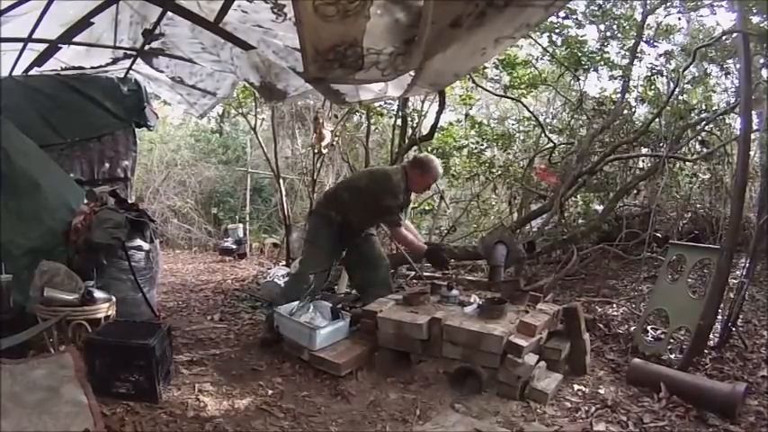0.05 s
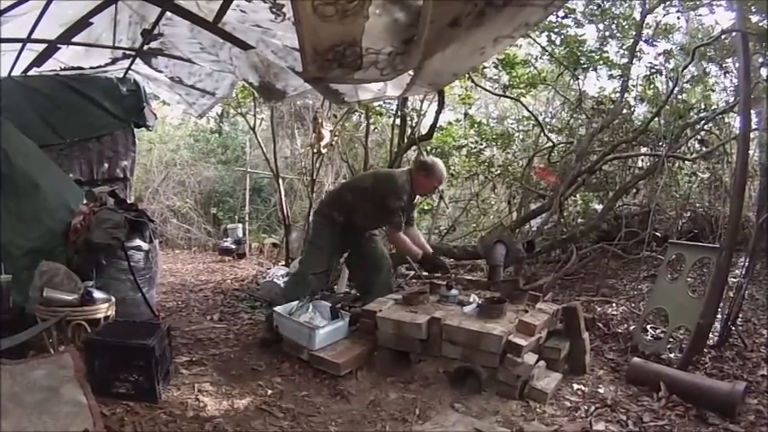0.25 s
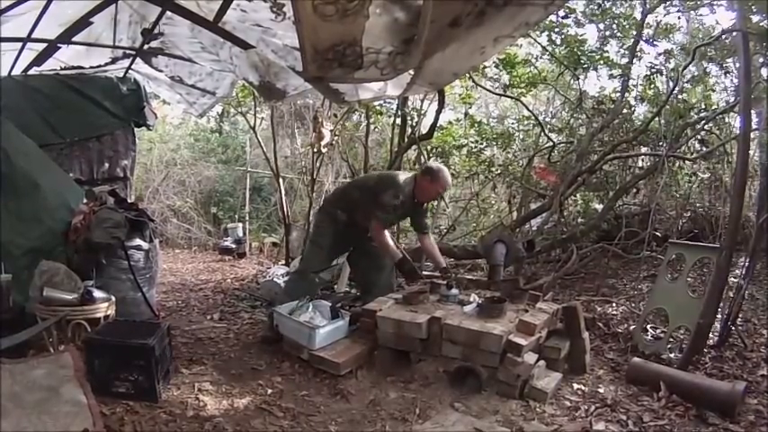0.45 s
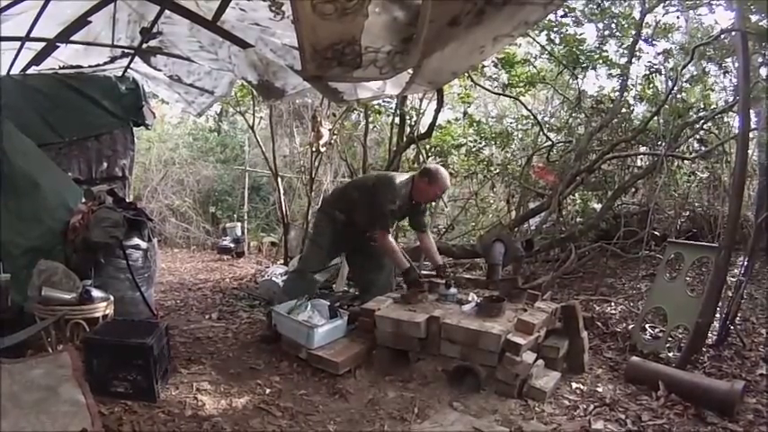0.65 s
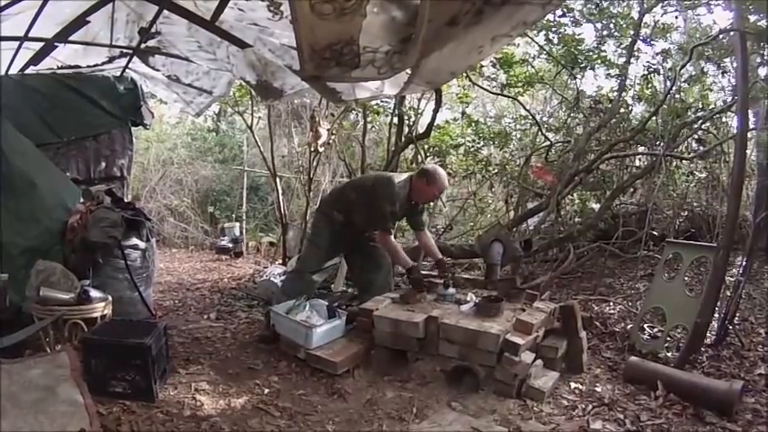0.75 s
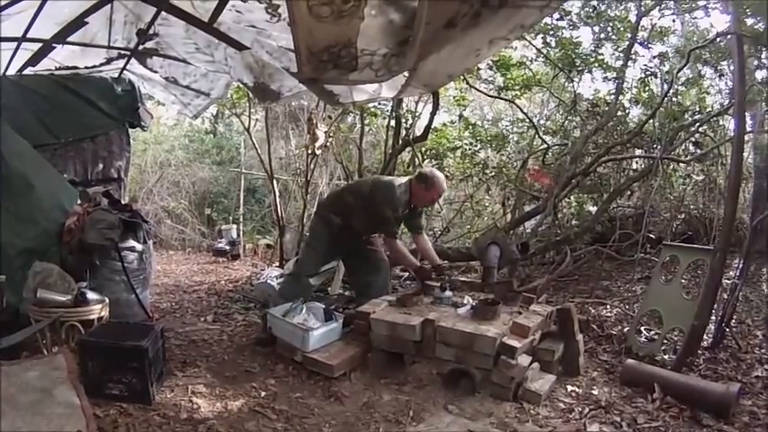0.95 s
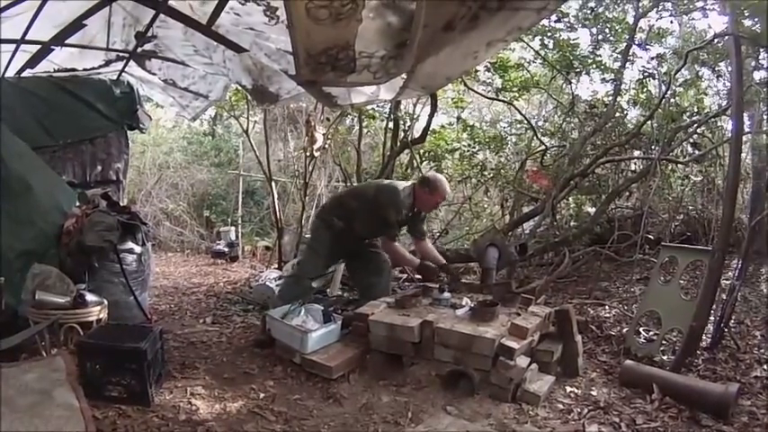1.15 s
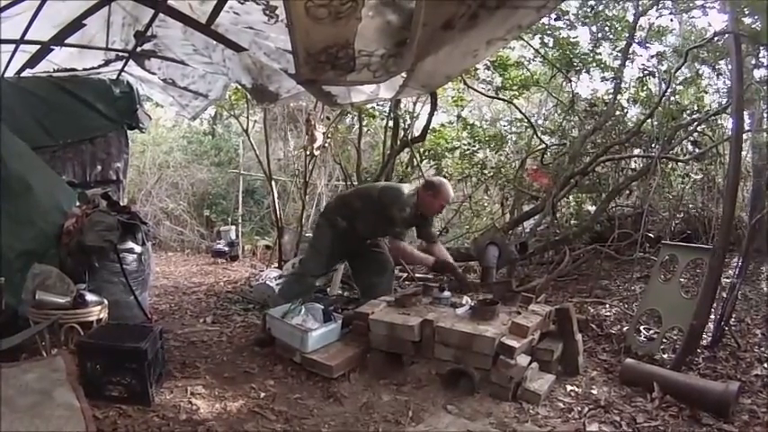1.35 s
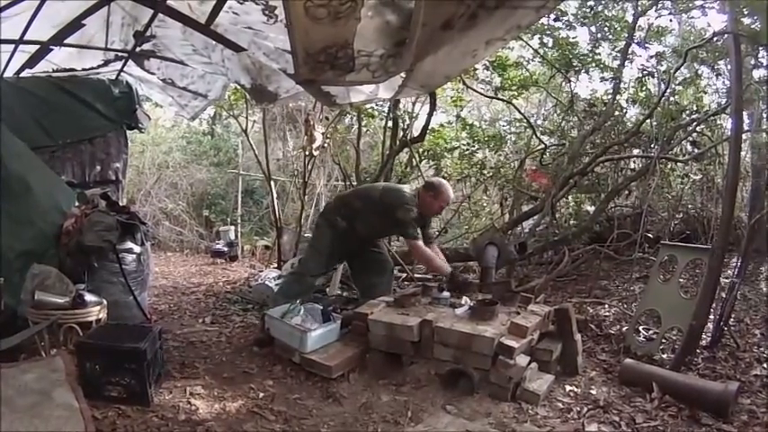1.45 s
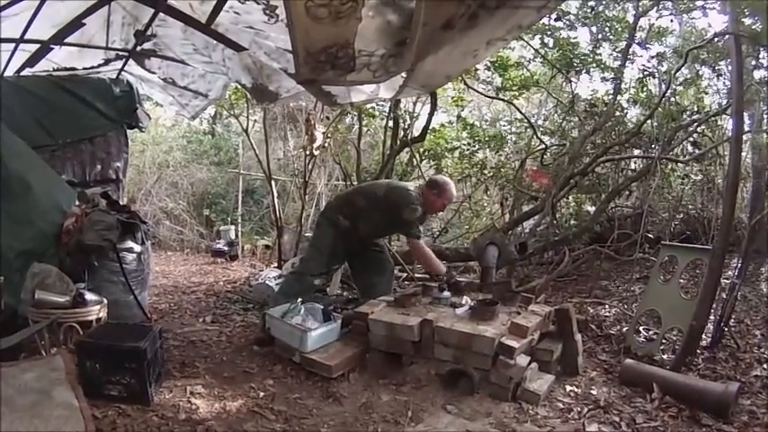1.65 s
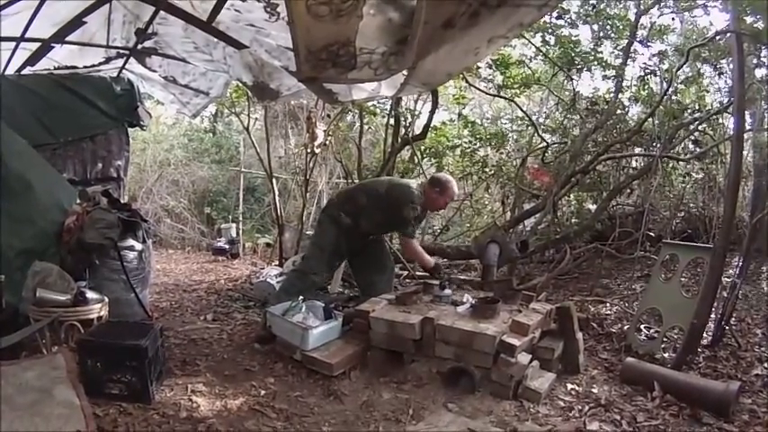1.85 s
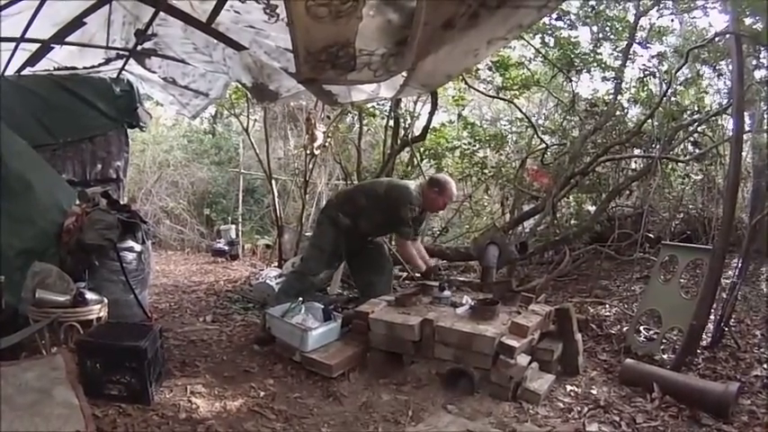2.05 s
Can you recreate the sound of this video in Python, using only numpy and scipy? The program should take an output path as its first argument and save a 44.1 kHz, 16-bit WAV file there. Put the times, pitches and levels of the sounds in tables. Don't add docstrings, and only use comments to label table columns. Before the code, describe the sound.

One sharp, hollow knock of a tool on dry clay and brick comes almost at once, a few metres from the microphone under a tarp, then faint rustling over quiet distant traffic and leaf hiss.

```python
import sys
import numpy as np
from scipy import signal
from scipy.fft import dct
from scipy.io import wavfile
from scipy.ndimage import uniform_filter1d

SR = 44100
rng = np.random.default_rng(int(sys.argv[2]) if len(sys.argv) > 2 else 0)


def convert_level_to_amplitude(level_db):
    exponent = np.asarray(level_db, float) / 20
    return 10 ** exponent


def dump_mix(stems):
    frames = np.atleast_2d(stems).T
    limited = np.clip(frames, -1, 1)
    pcm = np.round(limited * 32767).astype(np.int16)
    wavfile.write(sys.argv[1], SR, pcm)


N = 92610

# frequency in Hz, level in dB per Hz.
TRAFFIC = [(80, -4), (135, -7), (200, -9), (400, -11), (600, -13), (850, -8.5), (1000, -20), (1200, -46)]
# frequency in Hz, level in dB per Hz.
HISS = [(650, -32), (1100, -4.5), (1480, -4), (2010, -3), (3070, -7), (5550, -10.5), (15000, -24.5)]
# time in seconds, level in dB.
WIND = [
    (0.0, -61),
    (1.48, -58),
    (1.51, -75),
    (1.55, -58),
    (1.67, -62.5),
    (1.71, -81),
    (1.82, -56),
    (2.03, -62),
    (2.05, -43.5),
    (2.1, -61),
]
# frequency in Hz, level in dB,
# t60 in seconds, sign.
KNOCK_MODES = [(133, -27.9, 0.0332, -1), (229, -35.2, 0.0833, -1), (275, -48.4, 0.1025, -1),
               (461, -30.3, 0.0404, 1), (503, -16.5, 0.0136, -1), (692, -9.1, 0.008, 1),
               (707, -26.6, 0.0804, 1), (772, -22.3, 0.0872, 1), (812, -14.0, 0.0236, 1),
               (853, -8.7, 0.0178, -1), (984, -19.8, 0.0298, -1), (1148, -28.8, 0.0427, -1),
               (1219, -20.8, 0.008, 1),
               (1581, -23.7, 0.0346, -1), (1681, -30.8, 0.0423, 1), (1757, -28.9, 0.039, -1),
                (1867, -39.3, 0.1057, -1), (1987, -24.4, 0.0894, 1), (2116, -27.9, 0.075, 1),
                (2304, -25.8, 0.14, -1), (2385, -38.3, 0.0639, -1), (2884, -35.3, 0.087, 1),
                (3060, -34.4, 0.1, 1), (3172, -24.5, 0.0278, 1), (3441, -29.8, 0.042, -1),
               (4450, -25, .04, 1), (5460, -21.5, .035, -1)]
# delay in seconds, level in dB, sign.
REFLECTIONS = [(-0.00117, -23.0, 1), (0.0018, -7.0, -1), (0.0038, -18.0, 1), (0.00558, -5.8, -1),
               (0.00628, -10.4, 1), (0.009, -49.8, -1), (0.01061, -9.8, 1), (0.01225, -17.7, 1),
               (0.01308, -28.0, -1), (0.01666, -20.1, -1), (0.02105, -19.6, 1), (0.02643, -24.0, 1),
               (0.04767, -37.8, 1)]
# frequency in Hz, level in dB per Hz.
SCATTER = [(150, -36), (350, -27), (700, -12), (1250, -15.5), (2200, -13.5), (2800, -18), (4500, -23),
           (14000, -47.5)]
# frequency in Hz, t60 in seconds.
SCATTER_T60 = [(200, 0.12), (800, 0.17), (2200, 0.12), (4000, 0.11), (7000, 0.13), (12000, 0.087)]
# time in seconds, peak in dB, frequency in Hz, overtones in dB.
TICKS = [
    (.4358, -50, 3000, -2),
    (1.7468, -53, 4900, -14),
    (1.7483, -55, 4600, -14),
    (1.7496, -54, 4800, -14),
]
# start in seconds, length in seconds, level in dB.
STROKES = [
    (0.488, .066, -64),
    (0.682, 0.066, -68),
    (0.737, .099, -59.5),
    (0.825, .082, -57.5),
    (0.898, 0.057, -58),
    (0.964, 0.11, -67.5),
    (1.503, 0.13, -63),
    (1.638, 0.058, -65),
    (1.708, 0.053, -61),
]
# frequency in Hz, level in dB per Hz.
RUSTLE = [(500, -5.5), (800, 13), (1200, -8), (2000, -2.5), (3000, -2.5), (6300, -2), (7500, -9),
          (15000, -16)]
# start in seconds, level in dB, frequency in Hz.
GROAN = (1.692, -53, 258)
# time in seconds, sparse above Hz, nearly empty above Hz.
THINNED = [
    (.097, 13000, 13000),
    (.514, 4500, 7500),
    (.621, 4000, 7200),
    (1.623, 3500, 9300),
    (1.666, 5000, 7000),
    (1.729, 3000, 6500),
]

KNOCK_S = 0.110437


def rms_one(x):
    return x / np.sqrt(np.mean(x ** 2) + 1e-20)


def at_hz(points, hz):
    table = np.array(points)
    return np.interp(np.log(hz), np.log(table[:, 0]), table[:, 1])


def butterworth(x, order, edges_hz, kind):
    return signal.sosfilt(signal.butter(order, edges_hz, kind, fs=SR, output="sos"), x)


def drift(rate_hz):
    r = np.exp(-80 * np.pi * rate_hz / SR)
    noise = rng.standard_normal(N // 40 + 2002)
    slow = signal.lfilter([1], [1, -2 * r, r * r], noise)[2000:]
    return np.interp(np.arange(N) / 40, np.arange(len(slow)), rms_one(slow - slow.mean()))


def ring(x, hz, t60):
    r, w = convert_level_to_amplitude(-60 / (t60 * SR)), 2 * np.pi * hz / SR
    return signal.lfilter([0, np.sin(w)], [1, -2 * r * np.cos(w), r * r], x + 1e-18)


def click(s, cut_hz):
    impulse = np.maximum(0, 1 - np.abs(np.arange(N) - s * SR))
    r = np.exp(-2 * np.pi * min(cut_hz, 15000) / SR)
    return signal.lfilter([(1 - r) ** 2], [1, -2 * r, r * r], impulse + 1e-18)


def bands(sources, spectrum, patchy_db, shape=lambda hz: 1):
    edges = 50.4 * 2 ** np.arange(0, 8.5, 1 / 3)
    together = drift(1.0)
    out = 0
    for k, (low, high) in enumerate(zip(edges, edges[1:])):
        hz = np.sqrt(low * high)
        band = butterworth(sources[k % 2], 2, [low, high], "band")
        flicker_db = patchy_db * (2.4 * together + drift(50.0))
        out = out + band * convert_level_to_amplitude(at_hz(spectrum, hz) + flicker_db) * shape(hz)
    return out


def air():
    hum_hz, hum_width_hz = 125, 18
    roar = rms_one(bands(rng.standard_normal((2, N)), [*TRAFFIC, (2400, -75)], 0.6))
    hum = rms_one(ring(rng.standard_normal(N), hum_hz, 2.0 / hum_width_hz))
    hiss = rms_one(bands(rng.standard_normal((2, N)), HISS, 0.4))
    return convert_level_to_amplitude(-56) * roar + convert_level_to_amplitude(-64.5) * hum + convert_level_to_amplitude(-64.5) * hiss


def wind():
    s, db = np.transpose(WIND)
    low = butterworth(rng.standard_normal(N + SR), 3, [12, 36.8], "band")[SR:]
    lumps_db = 3 * drift(16.0)
    return rms_one(low) * convert_level_to_amplitude(np.interp(np.arange(N) / SR, s, db) + lumps_db)


def knock():
    contact_hz, return_hz = 2500, 1800
    blow = click(KNOCK_S, contact_hz)
    for delay, db, sign in REFLECTIONS:
        cut_hz = return_hz if delay > 0 else contact_hz
        blow = blow + sign * convert_level_to_amplitude(db) * click(KNOCK_S + delay, cut_hz)
    rings = 0
    for hz, db, t60, sign in KNOCK_MODES:
        rings = rings + sign * convert_level_to_amplitude(db) * ring(blow, hz, t60)
    return butterworth(convert_level_to_amplitude(-0.2) * rings, 2, 128, "high")


def scatter():
    lead_s, rise_cycles, rise_min_s = 0.0012, 5, 0.0026
    t = np.maximum(np.arange(N) / SR - KNOCK_S + lead_s, 0)

    def envelope(hz):
        rise = np.minimum(t / max(rise_cycles / hz, rise_min_s), 1) ** 2
        return rise * convert_level_to_amplitude(np.maximum(-60 * t / at_hz(SCATTER_T60, hz), -200))

    return convert_level_to_amplitude(-33) * 20 * bands(rng.standard_normal((2, N)), SCATTER, 0.5, envelope)


def small_contacts():
    groan_s, tick_t60_s = 0.045, 0.006
    start, level_db, groan_hz = GROAN
    phase = np.clip((np.arange(N) / SR - start) / groan_s, 0, 1)
    tone = np.sin(2 * np.pi * groan_hz * groan_s * phase * (1 + 0.047 * phase))
    out = convert_level_to_amplitude(level_db) * np.sin(np.pi * phase) * tone
    for s, db, hz, over_db in TICKS:
        tick = click(s, 15000)
        overtones = sum(ring(tick, hz * ratio, tick_t60_s) for ratio in (2, 3.4))
        out = out + convert_level_to_amplitude(db) * (ring(tick, hz, tick_t60_s) + convert_level_to_amplitude(over_db) * overtones)
    return out


def rustle():
    grains_per_s, spread_db, edge_s = 4300, 2.5, 0.045
    sizes = convert_level_to_amplitude(spread_db * np.minimum(rng.exponential(1, (2, N)), 5)) * rng.choice([-1, 1], (2, N))
    grains = sizes * (rng.random((2, N)) < grains_per_s / SR)
    t, stroke = np.arange(N) / SR, 0
    for s, length, db in STROKES:
        inside_s = np.minimum(t - s, s + length - t)
        stroke = stroke + convert_level_to_amplitude(db) * np.clip(inside_s / edge_s + 0.5, 0, 1)
    return stroke * rms_one(bands(grains, RUSTLE, 0.7))


def thin_treble(x, s, sparse_hz, empty_hz):
    size = int(0.028 * SR)
    start = int(s * SR) - size // 2
    window = np.sin(np.pi * (np.arange(size) + 0.5) / size)
    lines = dct(x[0, start:start + size] * window, type=4, norm="ortho")
    hz = np.arange(size) * SR / 2 / size
    usual = np.sqrt(uniform_filter1d(lines ** 2, size=41))
    step = np.where(hz > empty_hz, 2.8, np.where(hz > sparse_hz, 1.8, 0))
    share = np.where(np.abs(lines) < step * usual, 1, -0.9 * (step > 0))
    lost = np.zeros_like(x)
    lost[0, start:start + size] = window * dct(lines * share, type=4, norm="ortho")
    return x - lost


def scene():
    return (knock() + scatter() + air() + wind() + rustle() + small_contacts())[None, :]


def band_limit(x):
    return signal.sosfilt(signal.butter(12, 15240, fs=SR, output="sos"), x)


def record(dry):
    mix = signal.sosfilt(signal.cheby2(14, 50, 15900, fs=SR, output="sos"), dry)
    for s, sparse_hz, empty_hz in THINNED:
        mix = thin_treble(mix, s, sparse_hz, empty_hz)
    return band_limit(mix)


dry = scene()
out = record(dry)
dump_mix(out)
```